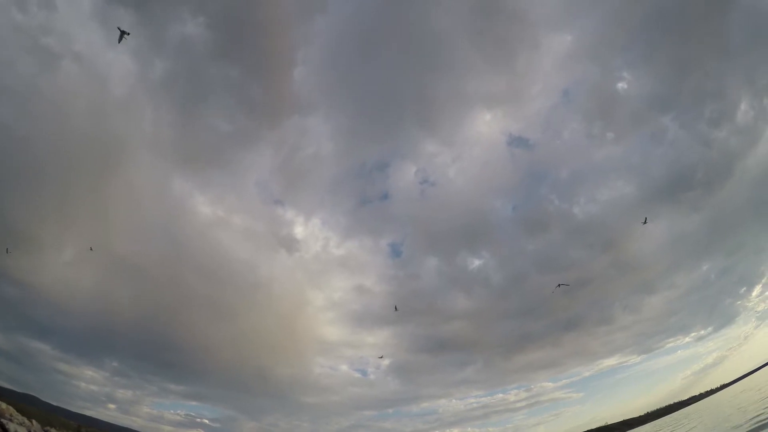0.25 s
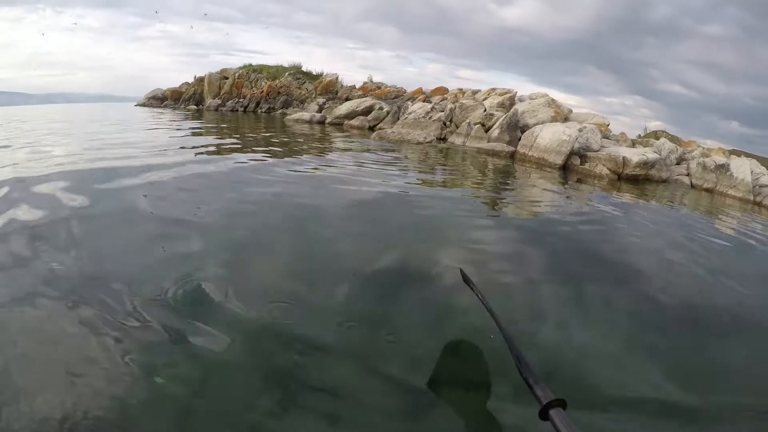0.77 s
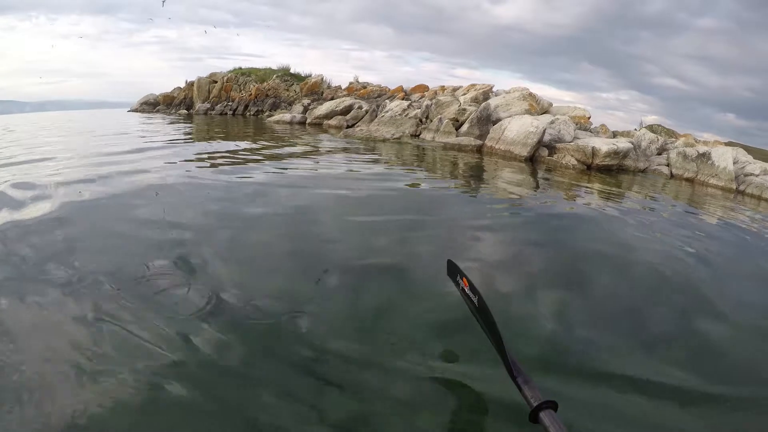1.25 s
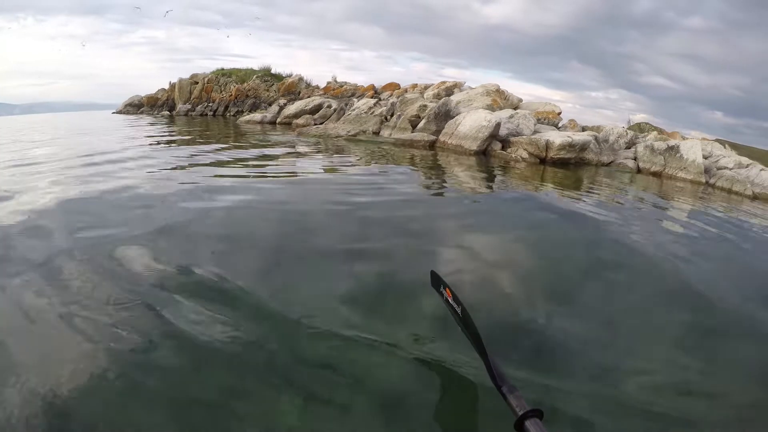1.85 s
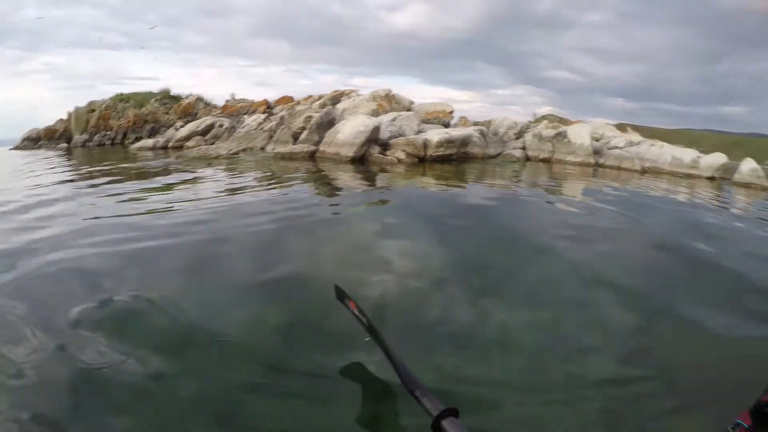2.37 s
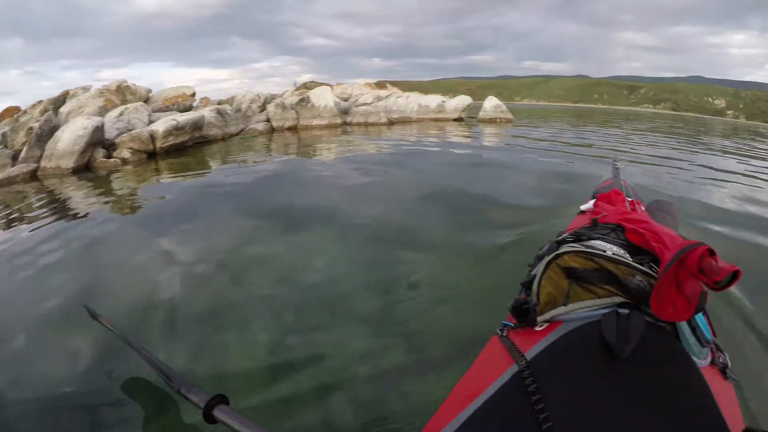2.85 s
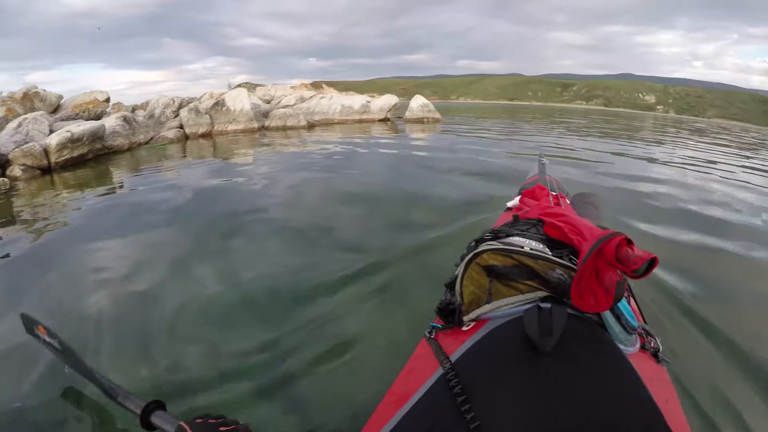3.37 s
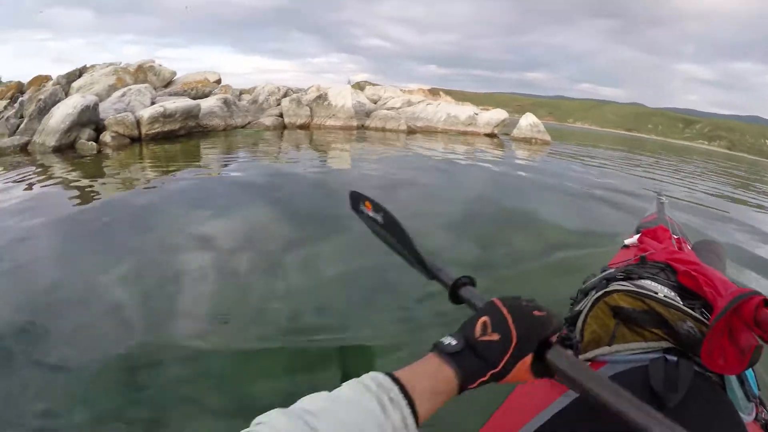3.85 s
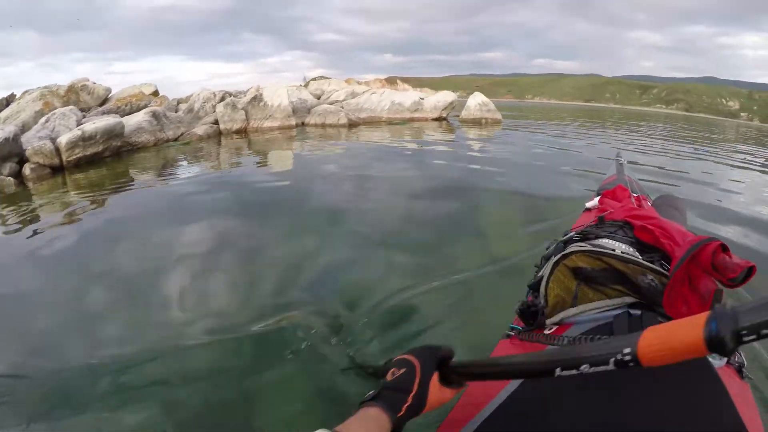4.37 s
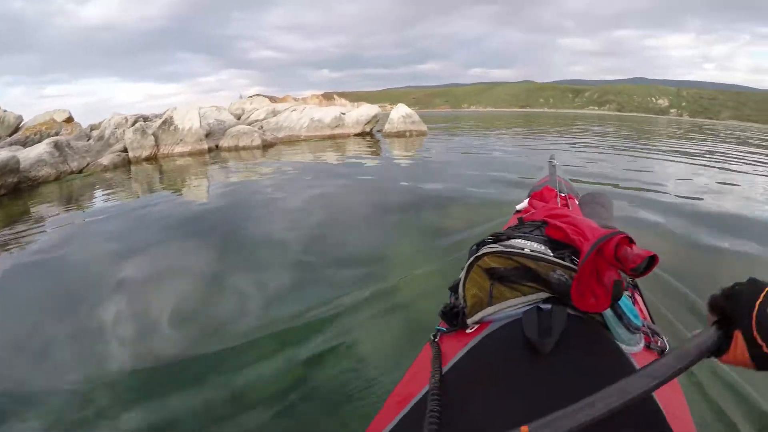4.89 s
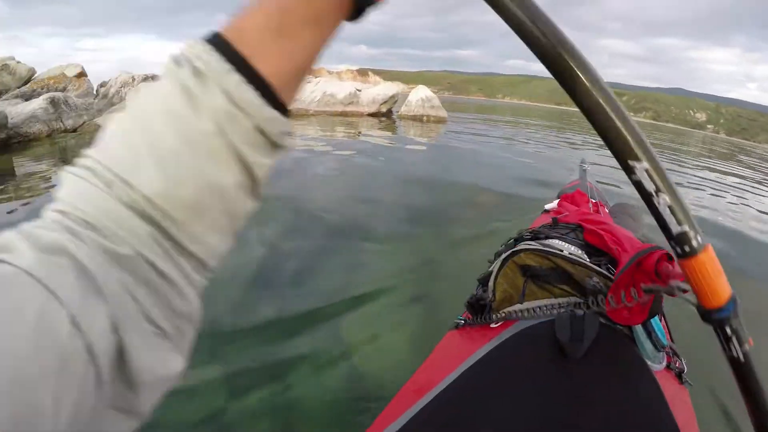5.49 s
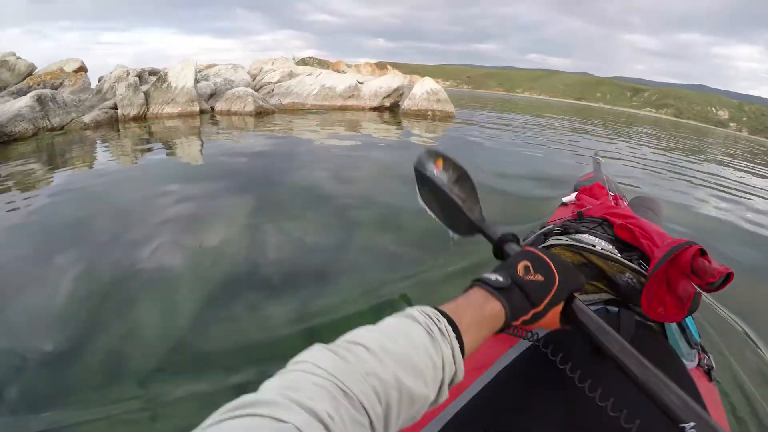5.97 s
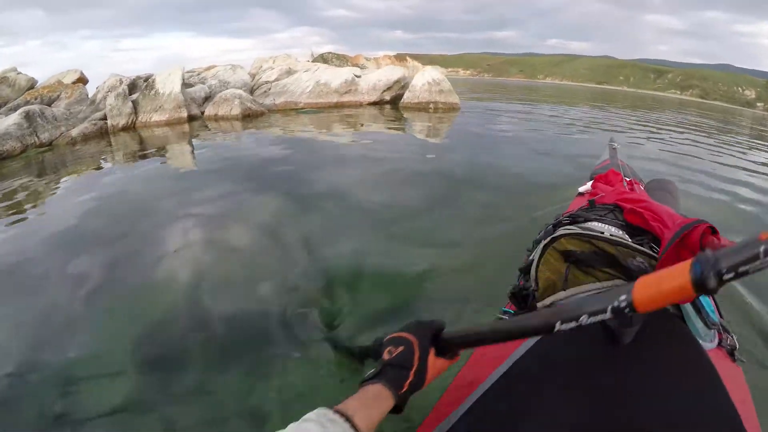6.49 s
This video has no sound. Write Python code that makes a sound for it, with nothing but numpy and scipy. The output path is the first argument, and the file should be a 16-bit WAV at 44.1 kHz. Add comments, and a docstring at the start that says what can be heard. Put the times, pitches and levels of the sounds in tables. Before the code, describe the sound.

Hoarse gull cries and a distant flock sound over low wind buffeting, joined later by gentle paddle strokes and dripping water.

```python
"""Calm water off a gull colony, heard from a kayak on the microphone of a small cased camera.
Near gulls give short, hoarse, mostly falling cries, a run of yaps and two long mews over the
echoing clamour of the far flock. Wind booms in the case over a low hum, and insects throb ashore.
Late on, a paddle stroke close by stirs ringing bubbles, drips, and thuds on the hull."""
import sys
import numpy as np
from scipy import signal
from scipy.io import wavfile
from scipy.ndimage import uniform_filter1d

SR = 44100
rng = np.random.default_rng(int(sys.argv[2]) if len(sys.argv) > 2 else 0)


def bounce(signal):
    """Save signal as a 16-bit WAV file at the path given by the first command-line argument."""
    frames = np.transpose(np.atleast_2d(signal))
    limited = np.clip(frames, -1, 1)
    pcm = np.round(limited * 32767).astype(np.int16)
    wavfile.write(sys.argv[1], SR, pcm)


N = 296793
T = np.arange(N) / SR

# Distant hiss of water and breeze. Each row: time in seconds, level in dB.
HISS_LEVELS = [(0, -59), (0.58, -58), (0.66, -66.5), (1, -60), (4.2, -59), (5.1, -55.5), (6.73, -55.5)]
# Colour of that hiss. Each row: frequency in Hz, relative density in dB.
HISS_COLOUR = [(200, 7.5), (400, 4.5), (800, 3), (1600, 3.5), (3200, -2.5), (5000, -1.5), (7000, -7.5),
               (10000, -9.5), (14500, -10)]
# Insects ashore. Each row: centre in Hz, width in Hz, level in dB, bursts per second.
INSECT_BANDS = [(8420, 220, -68, 27), (7710, 220, -73, 7)]
# The low hum. Each row: time in seconds, pitch in Hz, level in dB.
HUM_PATH = [(0.0, 65, -46), (0.31, 59.2, -29), (0.45, 57.9, -38), (1.63, 59.56, -30.5), (1.78, 58.1, -41),
            (2.99, 66.7, -42.5), (3.23, 56.2, -43.5), (3.4, 61, -42), (4.06, 60.85, -43.5), (4.3, 56, -34)]
# Wind on the case. Each row: time in seconds, buffet level in dB, boom level in dB.
GUSTS = [(0, -29.5, -45.5), (0.2, -45, -45), (0.62, -33, -29), (0.9, -32, -36.5), (1.35, -34.5, -37),
         (1.95, -35.5, -32.5), (2.3, -44.5, -45.5), (2.8, -41.5, -48), (3.5, -39, -51),
         (3.62, -31.5, -41.5), (4.1, -44.5, -49.5), (4.3, -31.5, -39), (4.5, -36, -35.5), (4.66, -21, -33),
         (4.8, -31.5, -32.5), (5.55, -30.5, -34.5), (5.68, -30.5, -31), (5.8, -30.5, -38),
         (6.05, -28.5, -31), (6.3, -34.5, -37), (6.5, -30.5, -33), (6.73, -28, -35)]
# Flutter of the wind. Each row: time in seconds, level in dB.
FLUTTER_LEVELS = [(0, -45.5), (0.3, -47.5), (1.1, -48), (2.2, -50.5), (4.1, -51.5), (4.3, -45), (5.2, -42),
                  (5.8, -50), (6.05, -35.5), (6.3, -49), (6.73, -51.5)]
# Water and paddle knocking the hull. Each row: start in seconds, level in dB, pitch in Hz.
HULL_THUDS = [(4.243, -25, 114), (4.292, -24, 86), (4.617, -13, 35.2), (5.211, -36, 120),
              (5.298, -25.5, 112), (5.682, -13.5, 45), (5.869, -19.5, 93), (5.939, -19, 50),
              (6.002, -24, 96), (6.073, -24, 112), (6.151, -25, 61), (6.375, -24.5, 120)]
# Water stirred beside the kayak. Each row: time in seconds, level in dB.
STROKE_LEVELS = [(4.15, -61), (4.25, -60.5), (4.33, -44), (4.49, -41.5), (4.63, -40), (4.88, -47.5),
                 (5, -53), (5.25, -73), (5.38, -51), (5.6, -57.5), (5.7, -61.5), (6.08, -49), (6.2, -56),
                 (6.5, -66), (6.6, -46.5), (6.73, -60)]
# Hollow colour that hull and case give the splash. Each row: centre in Hz, width in Hz, gain in dB.
HULL_RESONANCES = [(362, 300, -6), (920, 500, -4), (1265, 66, 4), (1820, 490, 4.5), (2540, 360, 3),
                   (3590, 180, -2.5), (5960, 4600, -38)]
# Close drips and slaps. Each row: start in seconds, bubble level in dB, pitch in Hz, spray gain in dB.
DROPS = [(4.303, -30, 1730, -50), (4.321, -29, 1230, -43), (4.498, -31, 1047, -40),
         (4.361, -19.5, 2850, -32), (4.389, -37, 1550, -23), (4.432, -26, 1770, -38),
         (4.475, -28, 1230, -50), (4.561, -21, 3550, -30.5), (4.562, -22, 2850, -34),
         (4.614, -17.5, 1770, -26), (4.624, -20, 2370, -33), (4.667, -27.5, 1310, -46),
         (4.831, -25.5, 2650, -22), (4.896, -27.5, 1190, -42), (4.921, -26.5, 996, -29),
         (4.984, -26, 2500, -40), (5.014, -35, 2780, -26), (5.192, -32, 2770, -29), (5.36, -33, 1350, -26),
         (5.375, -31, 2860, -20.5), (5.399, -31, 1090, -37), (5.569, -27.5, 1010, -33),
         (5.677, -26, 1570, -21), (5.771, -26.5, 1204, -50), (5.869, -25, 2750, -51),
         (6.052, -35, 516, -50), (6.166, -34, 473, -50), (6.254, -38, 2940, -24), (6.347, -32, 1660, -33),
         (6.372, -28.5, 630, -37), (6.376, -29, 310, -50), (6.584, -28, 1770, -32), (6.594, -24, 1700, -30),
         (6.612, -25, 1860, -24), (6.626, -30, 1640, -28), (6.688, -24.5, 1690, -30),
         (6.691, -25, 1150, -45), (6.689, -29, 593, -50), (5.6, -32, 1010, -31)]
# Fine spray. Each row: start in seconds, length in seconds, level in dB.
SIZZLES = [(4.223, 0.023, -60), (4.333, 0.086, -58.5), (6.578, 0.069, -53), (6.664, 0.11, -59)]
# The far flock. Each row: time in seconds, level in dB.
FLOCK_LEVELS = [(0, -37), (0.12, -46), (0.22, -33.5), (0.45, -36), (0.6, -38), (0.66, -59), (1, -45),
                (1.15, -46.5), (1.5, -53.5), (1.57, -43), (1.85, -49.5), (2.05, -46.5), (2.32, -57.5),
                (2.55, -43), (2.8, -59.5), (3.05, -60.5), (3.15, -48), (3.35, -53.5), (3.58, -57),
                (3.78, -61), (3.9, -57.5), (4.3, -49), (4.7, -44), (5.1, -46.5), (5.7, -52.5), (6, -53.5),
                (6.45, -45), (6.73, -47.5)]
# Ringing colour of the far gulls, from their throats and the camera's case.
# Each row: centre in Hz, width in Hz, gain in dB.
FLOCK_RESONANCES = [(1170, 500, -4.5), (1800, 210, 5.5), (2210, 410, 3), (2770, 630, 10.5), (3393, 300, 5)]
# Two long mews, a list each. Each row: time in seconds, pitch in Hz, level and half-pitch level in dB.
MEW_PATHS = [
    [(0.348, 1040, -40, -60), (0.375, 1012, -39, -58), (0.46, 1039, -32, -52), (0.56, 1002, -35, -51),
     (0.595, 990, -41.5, -50), (0.618, 960, -41, -59)],
    [(3.07, 848, -52, -70), (3.098, 945, -51, -66), (3.14, 1071, -52, -46.5), (3.19, 1087, -42, -43),
     (3.228, 1094, -40.5, -69), (3.258, 1107, -42.5, -54), (3.35, 1108, -48.5, -55),
     (3.385, 1100, -43.5, -53), (3.41, 1045, -42, -59), (3.43, 920, -49, -73)],
]
# Colour of the mews. Each row: one mew's gains in dB at 1, 1.5, 2 .. 4 times its pitch.
MEW_COLOURS = [(-10.5, -16, -17.5, 3, 1, 9, -13.5), (-15, 3, 1.5, -22, -5, -6.5, -9.5)]
# One bird yapping in runs of about four a second. Each row: start in seconds, level in dB.
YAP_TIMES = [(2.21, -54), (2.478, -50), (2.72, -54), (2.96, -54), (3.44, -54), (3.685, -52.5), (3.953, -55),
             (4.204, -53), (4.7, -49), (4.915, -55), (5.94, -63), (6.172, -54.5), (6.32, -63), (6.435, -54),
             (6.68, -52)]
# Gulls close by. Each row: start and length in seconds, pitch at start, middle and end in Hz,
# levels of the first three partials in dB, level of the half-pitch lines in dB.
NEAR_CRIES = [(0.03, 0.052, 1133, 1100, 1030, -57, -48, -38, -76),
              (0.034, 0.053, 880, 890, 850, -74, -51, -48, -80),
              (0.077, 0.14, 1572, 1330, 1270, -52.5, -46, -80, -84),
              (0.218, 0.035, 1390, 1280, 1130, -80, -42, -80, -80),
              (0.553, 0.041, 1437, 1330, 1180, -80, -46, -80, -80),
              (0.142, 0.029, 1138, 1175, 1190, -54, -41, -36, -61),
              (0.184, 0.054, 1509, 1480, 1394, -40.5, -30.5, -47, -40.5),
              (0.226, 0.082, 1167, 1146, 1056, -46.5, -35.5, -26, -62),
              (0.304, 0.079, 1072, 1043, 1130, -49, -80, -39, -80),
              (0.445, 0.11, 1478, 1445, 1420, -44.5, -80, -80, -80),
              (0.615, 0.076, 1407, 1327, 1240, -66, -50.5, -59, -80),
              (0.906, 0.14, 1118, 1147, 995, -60, -58, -53.5, -51),
              (0.975, 0.12, 856, 873, 906, -80, -64, -47, -56),
              (1.037, 0.17, 1316, 1375, 1187, -60, -40.5, -52, -42),
              (1.08, 0.16, 1020, 980, 964, -54.5, -80, -75, -80),
              (1.194, 0.126, 1590, 1502, 1373, -45, -35, -80, -49),
              (1.619, 0.063, 1200, 1114, 1010, -55, -50, -41.5, -67),
              (1.692, 0.16, 1053, 959, 911, -55.5, -63, -50, -80),
              (1.699, 0.04, 1416, 1275, 1200, -80, -49, -80, -80),
              (1.845, 0.1, 1388, 1350, 1300, -61, -42, -50, -48.5),
              (1.895, 0.13, 1310, 1225, 1144, -50, -42, -54, -48),
              (2, 0.23, 1692, 1650, 1594, -57.5, -59.5, -80, -81),
              (2.262, 0.06, 1206, 1190, 1240, -59, -61, -69, -54),
              (2.34, 0.17, 1450, 1308, 1183, -54.5, -56.5, -80, -54.5),
              (2.44, 0.07, 1388, 1387, 1327, -59, -50.5, -69, -55),
              (2.533, 0.22, 1074, 1024, 963, -64, -52.5, -54.5, -57),
              (2.896, 0.062, 1668, 1726, 1860, -54.5, -83, -83, -82),
              (3.084, 0.047, 1213, 1240, 1280, -53, -67, -80, -45.5),
              (3.192, 0.11, 1007, 988, 924, -53, -52, -56, -80),
              (3.474, 0.069, 1556, 1527, 1475, -77, -54, -80, -82),
              (3.652, 0.041, 796, 835, 1020, -78, -49, -56, -80),
              (3.672, 0.16, 1420, 1430, 1500, -49, -57.5, -53.5, -77),
              (3.858, 0.13, 1390, 1274, 1170, -60, -57, -80, -60),
              (3.861, 0.19, 1072, 1080, 1050, -86, -58.5, -80, -88),
              (4.033, 0.096, 1043, 1050, 1040, -84, -37.5, -76, -80),
              (4.132, 0.042, 1520, 1330, 1183, -48.5, -48, -54, -80),
              (4.164, 0.024, 1054, 1014, 935, -73, -48, -44.5, -53),
              (5.085, 0.12, 1570, 1562, 1606, -47.5, -80, -82, -80),
              (5.242, 0.17, 1600, 1580, 1570, -55.5, -84, -80, -80),
              (5.522, 0.12, 1680, 1706, 1700, -56, -80, -80, -80),
              (6.327, 0.15, 1380, 1298, 1265, -56.5, -76, -82, -80),
              (5.581, 0.09, 1415, 1367, 1280, -54, -52.5, -53, -80),
              (6.24, 0.052, 897, 890, 950, -76, -59, -65, -80),
              (6.38, 0.11, 1385, 1360, 1360, -63, -59, -80, -50),
              (6.422, 0.11, 924, 994, 1060, -66, -49, -49, -80)]


def undb(db):
    """Decibels to amplitude."""
    return np.exp(np.asarray(db) * np.log(10) / 20)


def unit(x):
    """Scale to an RMS of 1."""
    return x / np.sqrt(np.mean(x ** 2))


def curves(table):
    """Columns of a table joined by straight lines in time."""
    times, *columns = np.transpose(table)
    return [np.interp(T, times, column) for column in columns]


def band(x, hz, width_hz):
    """One resonance, gain 1 at the centre."""
    return signal.lfilter(*signal.iirpeak(hz, hz / width_hz, SR), x)


def noise(hz, width_hz):
    """Noise through the same resonance twice."""
    return unit(band(band(rng.standard_normal(N), hz, width_hz), hz, width_hz))


def walk(rate):
    """Random levels held 1 / rate seconds and smoothed twice; spread 1."""
    hold = int(SR / rate)
    steps = np.repeat(rng.standard_normal(N // hold + 1), hold)
    smooth = uniform_filter1d(uniform_filter1d(steps, hold), hold)[:N]
    return unit(smooth - smooth.mean())


def add(out, start_s, x):
    """Mix a short sound in at its time."""
    i = max(int(start_s * SR), 0)
    out[i:i + len(x)] += x[:N - i]


def dull(x, top_hz):
    """Distance and the camera's case take off the treble."""
    return signal.sosfilt(signal.butter(4, top_hz, fs=SR, output="sos"), x)


def echoes(x, t60_s, delay_s):
    """Scattered returns from rocks and water: a decaying noise tail of unit energy."""
    t = np.arange(int(t60_s * SR)) / SR
    tail = rng.standard_normal(len(t)) * 1000. ** (-t / t60_s) * (t > delay_s)
    return signal.fftconvolve(x, tail / np.sqrt(np.sum(tail ** 2)))[:N]


def distant_hiss():
    """Water and breeze far off; each half-octave band flickers a little."""
    hz, db = np.transpose(HISS_COLOUR)
    out = 0
    for centre_hz in 200 * 2 ** np.arange(0, 6.3, .5):
        band_db = np.interp(np.log(centre_hz), np.log(hz), db) + 10 * np.log10(centre_hz / 6000)
        out += undb(band_db + 0.62 * walk(12)) * noise(centre_hz, centre_hz / 2)
    return out * undb(curves(HISS_LEVELS)[0] + 1.2 * walk(70))


def insects():
    """From the shore, two narrow rasps, pulsed fast and sung in uneven bursts."""
    out = 0
    for hz, width, db, rate in INSECT_BANDS:
        throb = np.sin(2 * np.pi * rate * np.cumsum(1 + .2 * walk(4)) / SR) + .7 * walk(5)
        bursts = 0.4 + 1 / (1 + np.exp(-3.0 * throb))
        out += undb(db) * unit(noise(hz, width) * bursts * undb(2.0 * walk(150)))
    return out


def hum(fade_s=0.38):
    """A low note that wavers and swells, perhaps a distant motor, gone once the paddle digs in."""
    hz, db = curves(HUM_PATH)
    note = np.sin(2 * np.pi * np.cumsum(hz * (1 + 0.0466 * walk(13))) / SR)
    fade = np.clip((HUM_PATH[-1][0] - T) / fade_s, 0, 1)
    return np.sqrt(2) * note * undb(db + 5.7 * walk(8.05)) * fade


def wind():
    """Gusts buffet the microphone and ring the hollow case near its one low note."""
    buffet_db, boom_db = curves(GUSTS)
    flutter = noise(123.0, 55.7) * undb(curves(FLUTTER_LEVELS)[0] + 2.04 * walk(22.1))
    return undb(buffet_db) * noise(28.9, 22.0) + undb(boom_db) * noise(57.3, 24.7) + flutter


def ring(hz, cycles, glide, attack_s):
    """A bubble or thud: a sine that rises in pitch and dies by 17 dB over the given cycles."""
    t = np.arange(int(3 * cycles / hz * SR)) / SR
    tone = np.sin(2 * np.pi * hz * t * (1 + glide * t * hz / cycles))
    return tone * np.exp(-2 * t * hz / cycles) * np.minimum(t / attack_s, 1)


def hull_thuds():
    """Each thud on the hull pushes the microphone in and swings for a cycle or two."""
    out = np.zeros(N)
    for start_s, db, hz in HULL_THUDS:
        add(out, start_s, -undb(db) * ring(hz, cycles=2.64, glide=0.035, attack_s=0.0026))
    return out


def paddle_stroke(count=2200):
    """Beside the kayak, clusters of small bubbles over a wash of noise, coloured by hull and case."""
    bubbles, start_s = np.zeros(N), STROKE_LEVELS[0][0]
    for when, pitch, length, loud in rng.random((count, 4)):
        bubble = ring(280 * 30 ** pitch, cycles=1 + 9.9 * length ** 2, glide=0.079, attack_s=0.00053)
        gain = undb(8.5 * loud ** 2 + 15.7 * pitch)  # small high bubbles are brief, strong ticks
        add(bubbles, start_s + when * (N / SR - start_s), gain * bubble)
    clusters = unit(bubbles * undb(1.7 * walk(28)))
    wash = undb(-1.2) * rng.standard_normal(N) * undb(2.8 * walk(90))
    splash = unit(sum(undb(db) * band(clusters + wash, hz, width) for hz, width, db in HULL_RESONANCES))
    stroke = undb(curves(STROKE_LEVELS)[0]) * np.clip((T - start_s) / 0.096, 0, 1)
    return stroke * (splash + undb(-7.0) * echoes(splash, t60_s=0.065, delay_s=0.003))


def drips():
    """Each close drop is a click of spray and one ringing bubble; fine spray sizzles above."""
    out, t = np.zeros(N), np.arange(SR // 25) / SR
    for start_s, db, hz, spray_db in DROPS:
        spray = dull(band(rng.standard_normal(len(t)), 3600, 2600), 4500)
        click = spray * np.exp(-t / 0.006) * np.minimum(t / 0.0022, 1)
        add(out, start_s, undb(db) * ring(hz, cycles=hz * 0.0074, glide=0.013, attack_s=0.0023))
        add(out, start_s, undb(spray_db) * click)
    fizz = noise(10360, 1500) * undb(3.7 * walk(210))
    for start_s, length_s, db in SIZZLES:
        out += undb(db) * fizz * np.clip(np.minimum(T - start_s, start_s + length_s - T) / 0.0017, 0, 1)
    return out + undb(-7.0) * echoes(out, t60_s=0.73, delay_s=0.00434)


def cry(own, length_s, path_hz, db, half_db, waver, rasp, fall_db=20):
    """Four flickering partials on an arching pitch; alternate weak cycles add half-pitch lines."""
    longest_swell_s, rough_s = 0.031, 0.18
    size = int(length_s * SR)
    progress = np.linspace(0, 1, size)
    offset = int(own * N / 2)  # own, 0 to 1, picks this bird's stretch of waver and rasp
    arch_hz = np.polyval(np.polyfit([0, .5, 1], path_hz, 2), progress)
    phase = 2 * np.pi * np.cumsum(arch_hz * (1 + np.resize(waver[offset:], size))) / SR
    # the fourth partial drops furthest below the third where the third stands out
    fourth_db = db[2] - fall_db * np.clip(1.5 + (db[2] - db[1]) / 10, 0, 1)
    voice = 0
    for k, partial_db in enumerate([*db, fourth_db]):
        flicker = np.resize(rasp[offset + k * size:], size)
        voice += undb(partial_db) * flicker * np.sin((k + 1) * phase + k * k)
    for k, drop_db in [(1, 11.5), (2, 0), (3, 14)]:
        voice += undb(half_db - drop_db) * np.sin((k + .5) * phase + k)
    edge = min(0.315, longest_swell_s / length_s)
    swell = np.sin(np.pi / 2 * np.clip(np.minimum(progress, 1 - progress) / edge, 0, 1))
    # long cries ring purer; the voice breaks as it starts
    hoarseness = min(1, (rough_s / length_s) ** 2) + np.exp(-progress * length_s / 0.018)
    return np.sqrt(2) * voice * swell * np.resize(rasp[offset:], size) ** hoarseness


def far_flock(count=750):
    """Many overlapping distant cries, coloured by throats and the camera's case, half lost in echo."""
    out, waver, rasp = np.zeros(N), 0.0068 * walk(120), undb(2.13 * walk(90))
    for when, own, length, pitch, glide, loud, doubled in rng.random((count, 7)):
        length_s, db = 0.03255 + 0.0939 * length ** 2, 7 * loud
        path_hz = (900 + 750 * pitch) * (1 + (0.0194 + .13 * glide) * np.array([1, .5, 0]))
        add(out, when * N / SR, cry(own, length_s, path_hz, [db] * 3, db - 18 * doubled, waver, rasp))
    out = dull(sum(undb(db) * band(out, hz, width) for hz, width, db in FLOCK_RESONANCES), 3530)
    out += undb(-8.5) * echoes(out, t60_s=1.0, delay_s=0.0073)
    out = np.roll(out, N // 2)  # the clamour is already under way at the start
    steady = out / np.sqrt(uniform_filter1d(out ** 2, SR // 5) + 1e-9)
    return steady * undb(curves(FLOCK_LEVELS)[0])


def mews(waver, rasp):
    """Each long cry follows its own path of pitch and effort; the half-pitch lines come and go."""
    out = np.zeros(N)
    for path, colour in zip(MEW_PATHS, MEW_COLOURS):
        hz, db, half_db = curves(path)
        half_phase = np.pi * np.cumsum(hz * (1 + waver)) / SR
        gate = np.clip(np.minimum(T - path[0][0], path[-1][0] - T) / 0.0052, 0, 1)
        for k, gain_db in enumerate(colour):
            level = undb(gain_db + (half_db if k % 2 else db)) * np.roll(rasp, k * SR // 10)
            out += np.sqrt(2) * gate * level * np.sin((k + 2) * half_phase + k * k)
    return out


def near_gulls():
    """Birds close by cry, yap and mew, each slightly hoarse in its own way, with a short echo."""
    out, waver, rasp = np.zeros(N), 0.0045 * walk(80), undb(1.8 * walk(170))
    yap_s, yap_hz = 0.0663, (1037, 1034, 956)
    yaps = [(start_s, yap_s, *yap_hz, db - 21, db + 3, db - 0.5, db - 10) for start_s, db in YAP_TIMES]
    for start_s, length_s, start_hz, mid_hz, end_hz, *db, half_db in NEAR_CRIES + yaps:
        path_hz = (start_hz, mid_hz, end_hz)
        add(out, start_s, cry(rng.random(), length_s, path_hz, db, half_db, waver, rasp, fall_db=17))
    out += mews(waver, rasp)
    return dull(out + undb(-14.0) * echoes(out, t60_s=0.54, delay_s=0.01), 3780)


def scene():
    """Everything reaches one microphone on the kayak."""
    gulls = near_gulls() + far_flock()
    background = wind() + hum() + distant_hiss() + insects()
    paddling = paddle_stroke() + drips() + hull_thuds()
    return (gulls + background + paddling)[None, :]


def record(dry):
    """The camera cuts the top steeply above 15.3 kHz."""
    return signal.sosfilt(signal.ellip(10, .2, 75, 15300, fs=SR, output="sos"), dry)


dry = scene()
out = record(dry)
bounce(out)
```